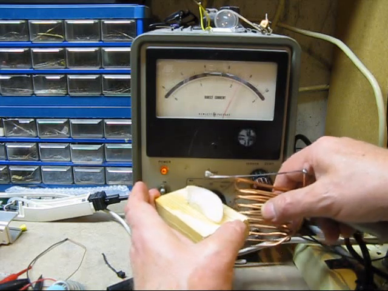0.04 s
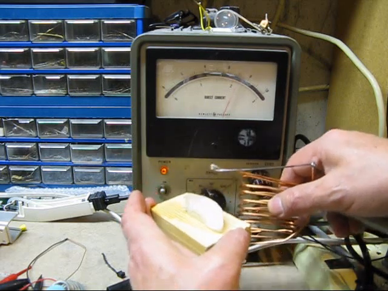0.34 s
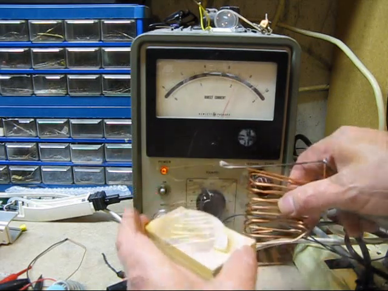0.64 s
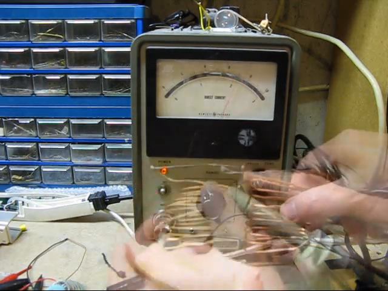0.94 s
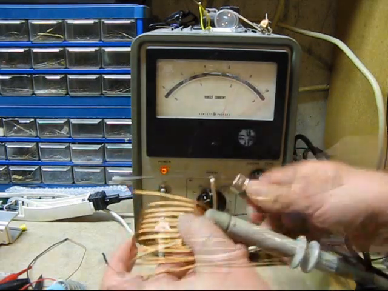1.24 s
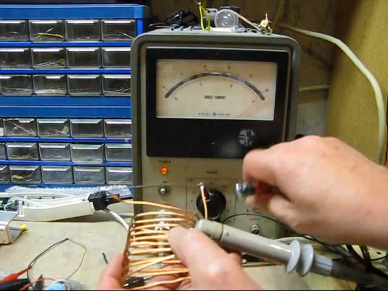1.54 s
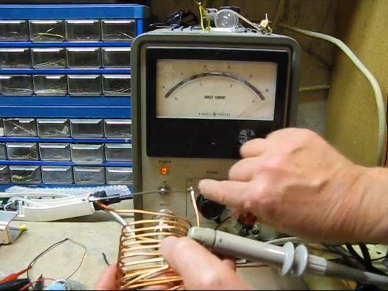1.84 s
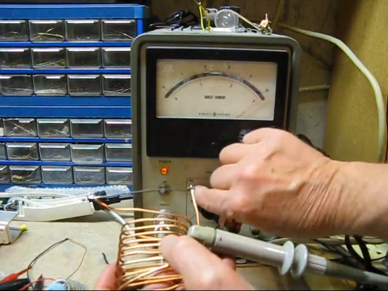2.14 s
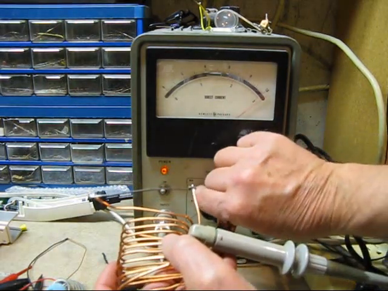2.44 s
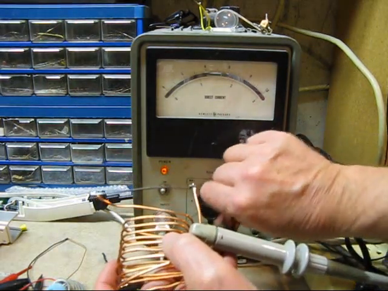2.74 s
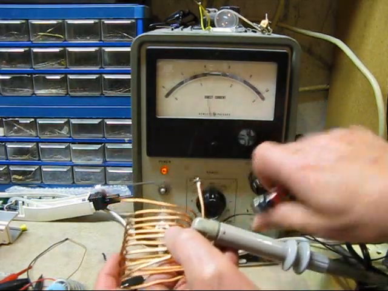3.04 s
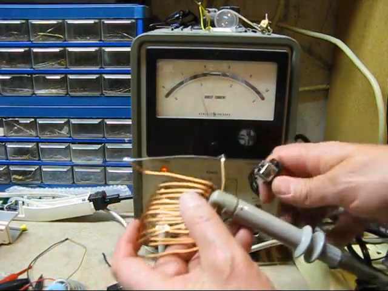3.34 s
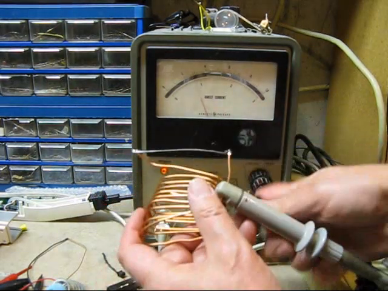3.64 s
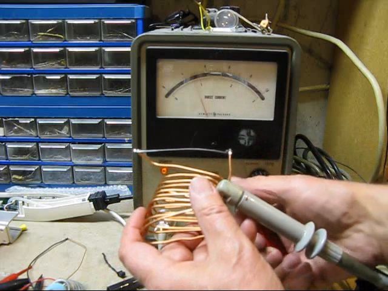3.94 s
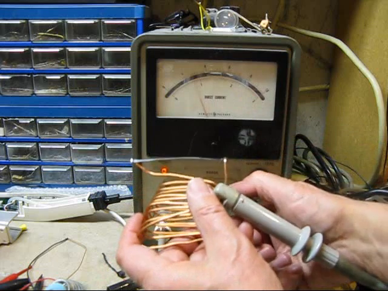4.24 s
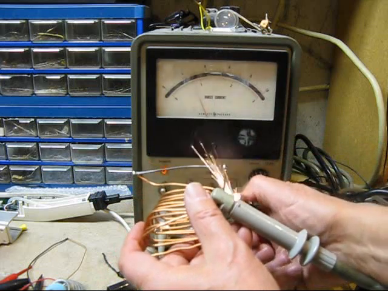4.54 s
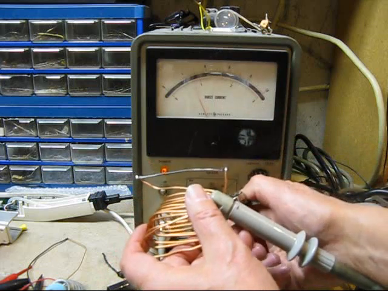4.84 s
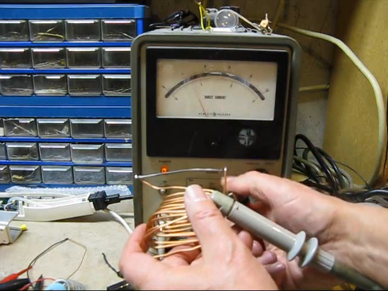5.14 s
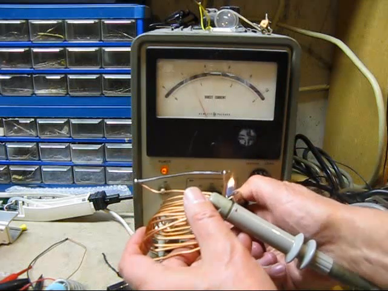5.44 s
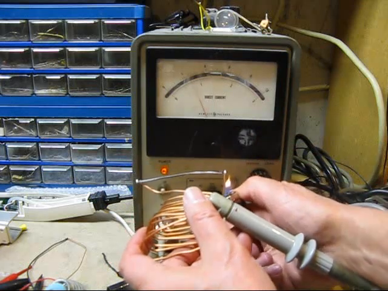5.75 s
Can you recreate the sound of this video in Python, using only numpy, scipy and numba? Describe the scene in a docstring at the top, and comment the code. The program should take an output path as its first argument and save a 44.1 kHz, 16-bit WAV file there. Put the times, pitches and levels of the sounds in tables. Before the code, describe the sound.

Wire rustles, a knob clunks, a switch snaps loudly, then a flint lighter is struck over a gritty fan hum.

```python
"""Lighter and meter at a workbench

Close to a bench in a small workshop, a fan humming behind. Hands work a wire coil and a probe,
a meter knob clunks, a switch snaps, then a flint lighter is thumbed and struck. A small camera's
microphone hears it: the gain control ducks after each loud sound, and the 8-bit, 11 kHz converter
turns the quiet into a gritty buzz."""
import sys
import numpy as np
from scipy import signal
from scipy.fft import rfft, irfft
from scipy.io import wavfile
from scipy.ndimage import uniform_filter1d
from numba import njit

SR = 44100
rng = np.random.default_rng(int(sys.argv[2]) if len(sys.argv) > 2 else 0)


def log_audio(samples):
    """Write samples as a 16-bit WAV file to the path given in sys.argv[1]."""
    # one column per channel
    frames = np.atleast_2d(samples).T
    # limit to full scale, then quantise
    limited = np.clip(frames, -1, 1)
    pcm = np.round(limited * 32767).astype(np.int16)
    wavfile.write(sys.argv[1], SR, pcm)


N = 254898


def lighter():
    """The wheel grinds on the flint, teeth catch, sparks crack with a puff of air, the lever clicks."""
    # the wheel creeps under the thumb: start_s, length_s, mid_level_db
    creeps = [(4.21, .4, -49.5), (4.322, .068, -39.5), (4.55, .07, -44.5)]
    # hard strokes of the wheel: let_go_s, length_s, let_go_level_db
    strokes = [(4.627, .03, -20.5), (5.272, .026, -24.5), (5.324, .049, -21.5)]
    # the wheel catches hard on the flint: start_s, peak_db
    catches = [(4.346, -25), (4.3945, -22), (4.4175, -22), (4.562, -27.5), (4.598, -22), (5.289, -19),
               (5.324, -13)]
    # spectrum of the rasp: freq_hz, level_db
    rasp_colour = [(150, -20), (340, -5), (500, -5), (950, -13), (1770, -12), (2450, -5), (2800, -5),
                   (3500, 1.5), (3900, -2), (4900, -3), (5400, -8.5), (7000, -38)]
    # ring of the lighter's body: pitch_hz, level_db, t60_s
    body_modes = [(1830, -11, .012), (2450, -9, .01), (2880, -5, .01), (3280, -3, .01), (3520, -1, .013),
                  (4000, -3, .008), (4450, -3, .008), (5080, -4, .008)]
    # ring of the gas lever: pitch_hz, level_db, t60_s
    lever_modes = [(430, -8, .022), (1790, 1, .018), (2820, 0, .015), (3330, -5, .01), (4000, 2, .013),
                   (4620, -6, .008)]
    rise_db, spark_lead_s, puff_s = 15, .004, .018
    spark_db, puff_db = 10.5, -4.7  # relative to the stroke
    creep = arches(creeps, power=.6)
    pressure = creep.copy()
    for s, length, db in strokes:  # the thumb bears down, then the wheel stops
        add(pressure, s - length, undb(db + rise_db * (seconds(length) / length - 1)))
        add(pressure, s, undb(db) * fade(seconds(.05), t60=.025))
    out = pressure * friction(rasp_colour, slips_per_s=5000, spread_db=2.1)
    moments = scattered(creeps[0][0], creeps[-1][0] + creeps[-1][1], count=18)
    teeth = [(s, rng.normal(16, 2)) for s in moments]  # peaks in dB over the creeping rasp
    out += creep * blows(teeth, body_modes, scuff_t60_s=.012, scuff=.3)
    sparks = [(s - spark_lead_s, db + spark_db) for s, _, db in strokes]
    out += blows(catches + sparks, body_modes, scuff_t60_s=.012, scuff=.3)
    lever_s, lever_db = 5.0795, -19.5
    chatter = bounced([(lever_s, lever_db)], gap_s=.001, step_db=-.5, count=4)
    out += blows(chatter, lever_modes, scuff_t60_s=.006, scuff=.15)
    puff = -np.hanning(int(puff_s * SR))
    for s, _, db in strokes:
        add(out, s - spark_lead_s - puff_s / 2, undb(db + puff_db) * puff)
    return out


def meter_switch():
    """The switch slides over its detent, snaps home, rattles and rings its spring and the case."""
    # spectrum of the rattle: freq_hz, level_db
    rattle_colour = [(100, -18), (400, -16), (900, -7), (1500, -8), (2000, -13), (2800, 4), (3800, 5),
                     (4700, -10), (5350, 3)]
    # ring of the meter's case: freq_hz, level_db
    case_colour = [(88, -44), (150, -14), (398, -19), (570, -28), (652, -4), (992, -12), (1220, -24),
                   (1280, -18), (1730, -30), (1950, -14), (2590, -1), (3340, -5), (5400, -11), (7020, -41),
                   (11900, -120)]
    snap_s, snap_db, contact_s, rebound_s = 2.6537, 11.6, .00027, .0013
    slide_s, spring_hz, spring_lag_s = .007, 5330, .0015
    out = np.zeros(N)
    time_left = seconds(slide_s)[::-1]
    grit = noise(case_colour, len(time_left))
    add(out, snap_s - slide_s, undb(-29) * grit * fade(time_left, t60=.03))
    t = seconds(.4)
    push = np.sin(np.pi * np.minimum(t / contact_s, 1))
    # the panel springs back more slowly than it was pushed
    rebound = undb(-14) * np.sin(np.pi * np.minimum(t / rebound_s, 1))
    rattle = undb(5.5) * noise(rattle_colour, len(t)) * fade(t, t60=.02)
    case = undb(-10.5) * noise(case_colour, len(t)) * fade(t, t60=.16)
    build_up = 1 - fade(t, t60=.005)
    add(out, snap_s, undb(snap_db) * (push - rebound) + (rattle + case) * build_up)
    spring = undb(3) * fade(t, t60=.007) * np.sin(2 * np.pi * spring_hz * t)
    add(out, snap_s + spring_lag_s, spring)
    return out


def meter_knob():
    """The knob clunks into its detents; its loose shaft knocks as it turns."""
    # drops into the detents: start_s, peak_db
    detents = [(1.630, -27), (1.706, -29), (1.765, -35), (1.775, -30.5), (1.810, -33.5)]
    # ring of the knob: pitch_hz, level_db, t60_s
    modes = [(190, -12, .035), (265, 1, .045), (390, -3, .035), (510, 0, .035), (690, -3, .02),
             (930, -2, .018), (1300, -4, .01), (2200, -4, .012), (2620, -3, .014), (3200, -9, .012)]
    clunks = bounced(detents, gap_s=.012, step_db=-8, count=2)
    knock_db = -38
    knocks = [(s, knock_db) for s in scattered(detents[0][0], detents[-1][0], count=6)]
    return blows(clunks + knocks, modes, scuff_t60_s=.035, scuff=.5)


def wire():
    """Wire rustles as it slides between the fingers; wire and probe tick and bounce lightly."""
    # skin and wire slide: start_s, length_s, mid_level_db
    slides = [(.02, 1.1, -51.8), (.94, .6, -48.6), (1.52, .38, -54.5), (2.428, .04, -52), (4.05, .22, -57)]
    # spectrum of the rustle: freq_hz, level_db
    rustle_colour = [(150, -10), (600, -2.5), (1300, -.5), (2400, 1), (3400, .5), (5400, -10)]
    # ticks of wire and probe: start_s, peak_db
    ticks = [(.980, -31), (1.0655, -22.5), (1.0895, -26.5), (2.433, -29.5)]
    # ring of a tick: pitch_hz, level_db, t60_s
    modes = [(480, -9, .02), (900, -6, .012), (1650, -2, .014), (2450, 0, .009), (3400, -1, .016),
             (4700, -8, .006)]
    hold_db = -66  # hands that only hold still rustle
    speed = np.hypot(arches(slides, power=.7), undb(hold_db))
    rustle = speed * friction(rustle_colour, slips_per_s=5000, spread_db=2.5)
    bounces = bounced(ticks, gap_s=.0078, step_db=-6.5, count=3)
    return rustle + blows(bounces, modes, scuff_t60_s=.015, scuff=.18)


def fingertips():
    """Soft fingertips stick and slip on lighter and coil, each slip only a few low cycles."""
    # runs of slips that grow and die away: middle_s, half_length_s, peak_db, pitch_hz
    rubs = [(1.083, .005, -34, 480), (4.099, .01, -40, 450), (4.440, .005, -34, 450),
            (4.985, .048, -28, 450), (5.078, .003, -29, 450), (5.194, .02, -36, 450),
            (5.318, .003, -25, 480), (5.400, .004, -37, 140), (5.460, .005, -33, 400),
            (5.762, .005, -32, 440)]
    slip_gap_s, edge_db, crest_cycles = .0125, -13, .55
    out, t = np.zeros(N), seconds(.06)
    for s, half_length, db, hz in rubs:
        for lag in slip_gap_s * np.arange(-4, 5):
            start = s + lag * rng.normal(1, .07)
            cycles = hz * rng.normal(1, .09) * t
            gain = undb(db + edge_db * abs(lag) / half_length)
            swing = cycles / crest_cycles * np.exp(1 - cycles / crest_cycles)
            add(out, start, gain * swing * np.sin(2 * np.pi * cycles))
    return out


def fan():
    """A shaft hum and a faint, wavering whine over moving air; early on, the background is louder for about a
    second."""
    # hum and whine: pitch_hz, level_db
    partials = [(58.11, -48.9), (116.2, -69), (174.3, -71), (685, -61), (722, -68), (1475, -67.5)]
    # spectrum of the moving air: freq_hz, level_db
    air_colour = [(25, -13), (60, -2), (140, 0), (280, 1.5), (400, 0), (560, -1.5), (740, -.5), (950, -3.5),
                  (1280, -6), (1510, 5), (1750, -3.5), (2100, -11), (3200, -16), (5400, -22)]
    swell_s, ramp_s, hold_s, swell_db = .51, .13, .78, 6.2
    air_db, speed_spread = -52.7, .0006
    t = np.arange(N) / SR
    corners = swell_s + np.cumsum([0, ramp_s, hold_s, ramp_s])
    swell = undb(swell_db * np.interp(t, corners, [0, 1, 1, 0]))
    drift = unit(uniform_filter1d(rng.standard_normal(N), SR // 2))
    shaft_time = t + speed_spread * np.cumsum(drift) / SR
    tones = sum(undb(db) * np.sin(2 * np.pi * hz * shaft_time) for hz, db in partials)
    air = undb(air_db) * noise(air_colour, N)
    return tones * swell + air * swell ** .7


def room(x, t60, wet_db):
    """Short, dense echoes from the bench and shelves."""
    t = seconds(.4)
    tail = rng.standard_normal(len(t)) * fade(t, t60) * (t > .003)
    return x + undb(wet_db) * signal.fftconvolve(x, tail / np.linalg.norm(tail))[:N]


def friction(points, slips_per_s, spread_db):
    """Dense tiny slips of very unequal size ring a body; rms 1."""
    slips = (rng.random(N) < slips_per_s / SR) * rng.standard_normal(N)
    sizes = undb(spread_db * np.minimum(rng.exponential(size=N), 4))
    return unit(colour(slips * sizes, points))


def blows(events, modes, scuff_t60_s, scuff):
    """Each blow is a tick and a short scuff that ring the modes, a little differently every time."""
    out, t = np.zeros(N), seconds(.1)
    for s, peak_db in events:
        detunes = rng.normal(1, .035, len(modes))
        ring = sum(undb(db) * fade(t, t60) * np.cos(2 * np.pi * hz * detune * t)
                   for (hz, db, t60), detune in zip(modes, detunes))
        push = scuff * rng.standard_normal(len(t)) * fade(t, scuff_t60_s)
        push[0] += 1  # the tick
        sound = signal.fftconvolve(push, ring)[:len(t)]
        add(out, s, undb(peak_db) * sound / np.abs(sound).max())
    return out


def arches(moves, power):
    """Gain of moves that each speed up and slow down again."""
    t, energy = np.arange(N) / SR, np.zeros(N)
    for s, length, db in moves:
        speed = np.sin(np.pi * np.clip((t - s) / length, 0, 1)).clip(0)
        energy += (undb(db) * speed ** power) ** 2
    return np.sqrt(energy)


def bounced(events, gap_s, step_db, count):
    """Each blow followed by weaker bounces."""
    return [(s + k * gap_s, db + k * step_db) for s, db in events for k in range(count)]


def scattered(start, end, count):
    """Uneven moments spread between two times."""
    return start + (end - start) * (np.arange(count) + rng.random(count)) / count


def colour(x, points, size=4096):
    """Minimum-phase filter through points of freq_hz, level_db."""
    hz, db = np.transpose(points)
    grid_hz = np.maximum(np.arange(size // 2 + 1) * SR / size, 1)
    gain = undb(np.interp(np.log(grid_hz), np.log(hz), db))
    cepstrum = irfft(np.log(gain))
    cepstrum[1:size // 2] *= 2
    cepstrum[size // 2 + 1:] = 0
    impulse = irfft(np.exp(rfft(cepstrum)))
    return signal.fftconvolve(x, impulse)[:len(x)]


def noise(points, count):
    """Coloured noise; rms 1."""
    return unit(colour(rng.standard_normal(count), points))


def undb(db):
    """Decibels to gain."""
    return 10 ** (np.asarray(db) / 20)


def unit(x):
    """Scale to rms 1."""
    return x / np.sqrt(np.mean(x ** 2))


def seconds(length):
    """Time axis of the given length."""
    return np.arange(int(length * SR)) / SR


def fade(t, t60):
    """Decay of 60 dB in t60 seconds."""
    return np.exp(-np.log(1000) * t / t60)


def add(out, s, sound):
    """Mix a sound in at time s."""
    i = min(int(s * SR), N)
    out[i:i + len(sound)] += sound[:N - i]


@njit
def gain_control(x, threshold, attack, release):
    """Peaks over the threshold charge a store that turns the gain down, then leaks away."""
    y, store = np.empty(len(x)), 0.
    for i in range(len(x)):
        y[i] = x[i] / (1 + store)
        store += attack * max(abs(x[i]) / threshold - 1 - store, 0.) - release * store
    return y


def scene():
    """Handling sounds at the bench in a small workshop, over the fan; mono."""
    bench = wire() + fingertips() + meter_knob() + meter_switch() + lighter()
    return (room(bench, t60=.13, wet_db=-10) + fan())[None]


def record(dry):
    """A bright microphone, gain control, then slow, coarse sampling that turns the hum into a buzz."""
    # microphone and input filter: freq_hz, gain_db
    microphone = [(20, 0), (1500, .5), (3000, 2), (4000, 3.8), (5500, 8), (6400, -10), (8000, -40)]
    threshold_db, attack_s, release_s = -23.6, .00054, .176
    converter_hz, step, offset_steps, hiss_db = 11025, 1 / 128, .625, -79
    rolloff_hz, top_hz = 14500, 15700
    heard = colour(dry[0], microphone)
    ducked = gain_control(heard, float(undb(threshold_db)), 1 / (attack_s * SR), 1 / (release_s * SR))
    ticks = np.arange(0, N, SR // converter_hz)
    # with this offset, ducked sound crosses a step only at the troughs of the hum
    steps = np.round(np.clip(ducked[ticks], -1, 1) / step + offset_steps)
    samples = steps * step + undb(hiss_db) * rng.standard_normal(len(ticks))
    # straight lines between the samples leave a faint mirror image in the treble
    joined = np.interp(np.arange(N), ticks, samples)
    softened = signal.lfilter(*signal.butter(1, rolloff_hz, fs=SR), joined)
    top_cut = signal.ellip(8, .2, 70, top_hz, fs=SR, output="sos")
    return signal.sosfilt(top_cut, softened)[None]


dry = scene()
out = record(dry)
log_audio(out)
```